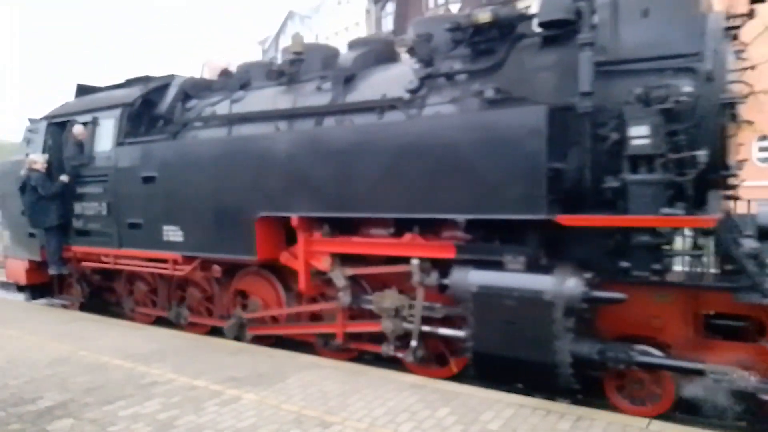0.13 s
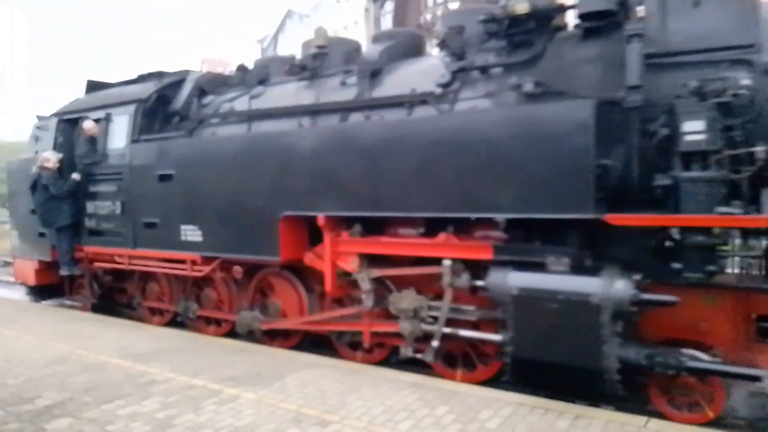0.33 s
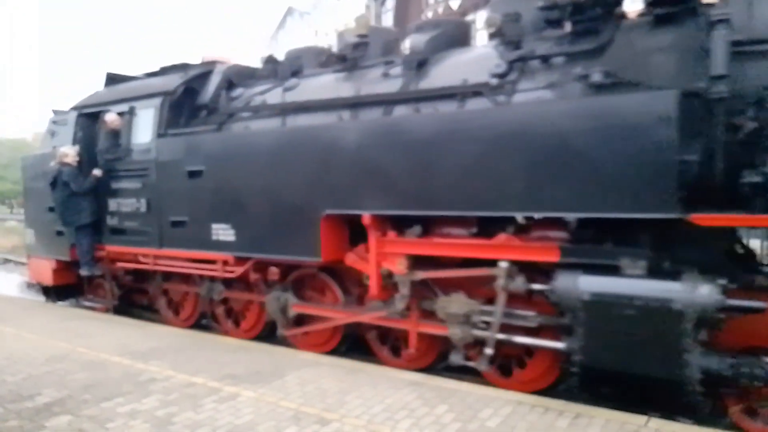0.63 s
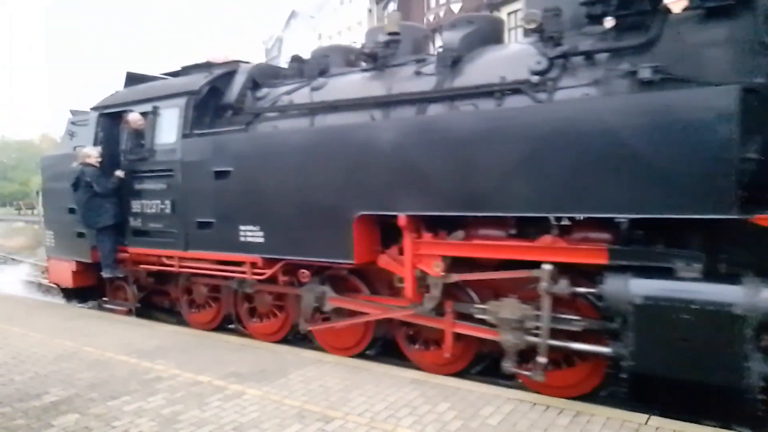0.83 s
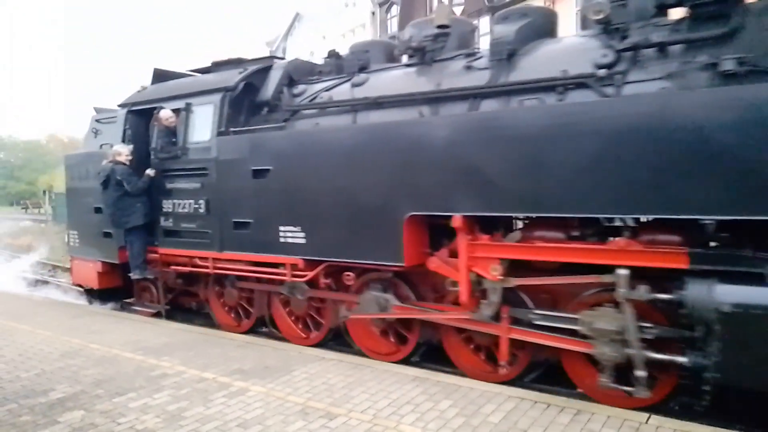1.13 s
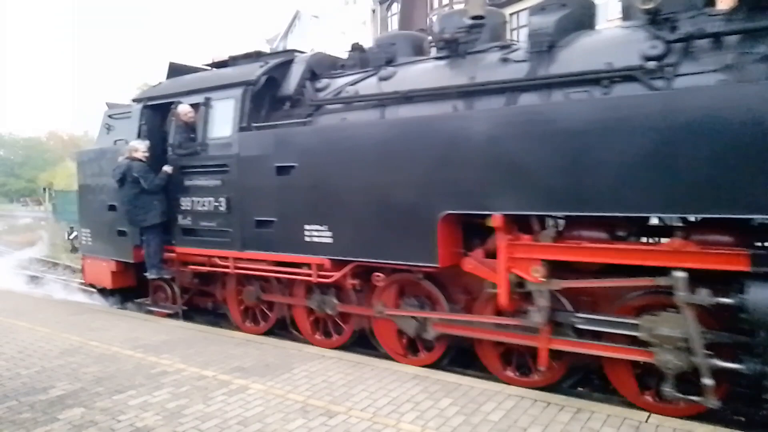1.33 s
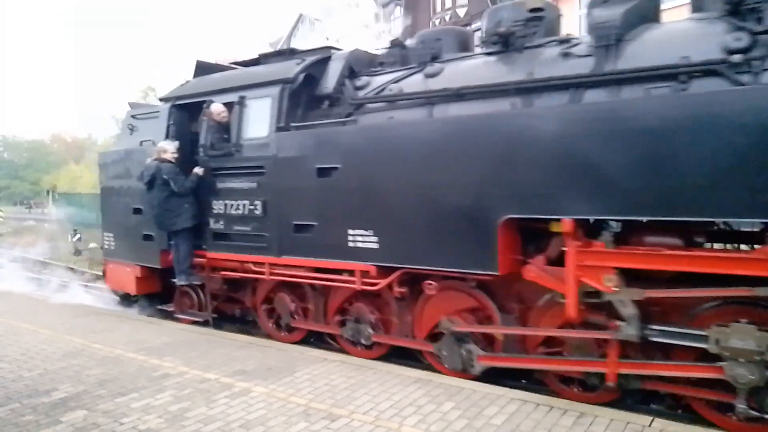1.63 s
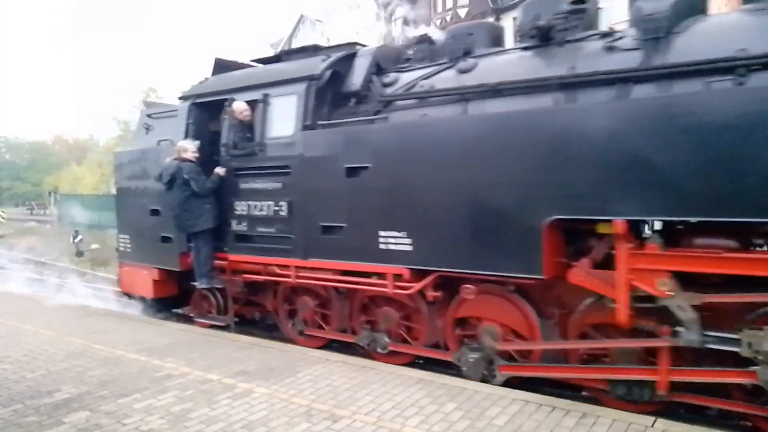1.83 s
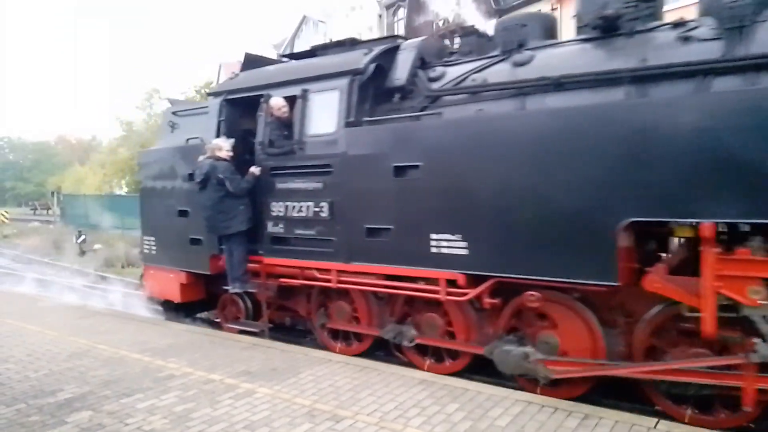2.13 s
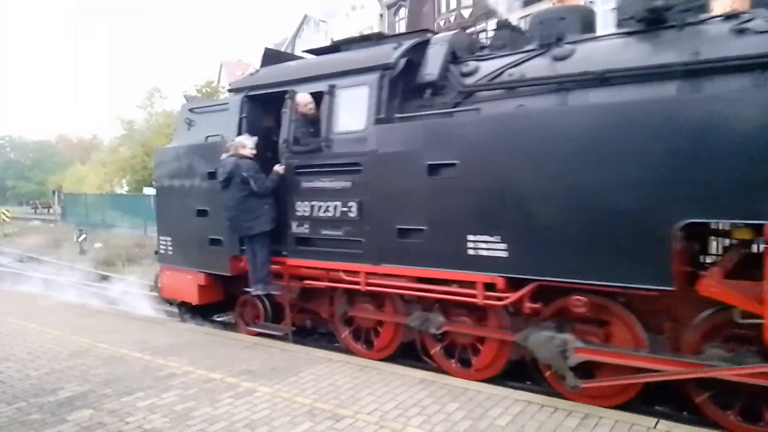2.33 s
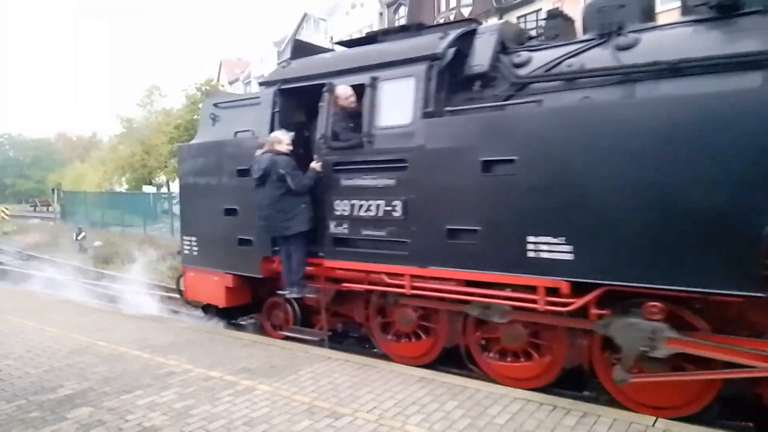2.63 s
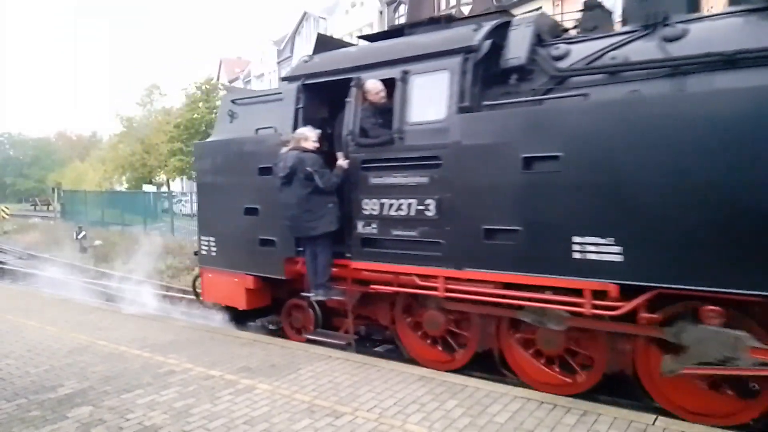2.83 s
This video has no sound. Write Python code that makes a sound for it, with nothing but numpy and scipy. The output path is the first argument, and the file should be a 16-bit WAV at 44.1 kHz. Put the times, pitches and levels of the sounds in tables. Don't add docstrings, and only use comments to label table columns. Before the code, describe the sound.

Continuous high, fluttering steam hiss from a slowly passing locomotive, with low rolling rumble and dull wheel thuds. Early knocks lead to a sudden steam blow and water sputter; thin whistles rise at the end. Outdoors, mono handheld camera.

```python
import sys
import numpy as np
from scipy import signal
from scipy.fft import rfft, irfft, next_fast_len
from scipy.io import wavfile
from scipy.ndimage import uniform_filter1d, map_coordinates

SR = 44100
rng = np.random.default_rng(int(sys.argv[2]) if len(sys.argv) > 2 else 0)


def voltage_ratio(level):
    return 10 ** (np.asarray(level, float) / 20)


def to_wav(s):
    ch = np.atleast_2d(s).T
    pcm = np.round(np.clip(ch, -1, 1) * 32767)
    wavfile.write(sys.argv[1], SR, pcm.astype(np.int16))


N = 131859

# frequency in Hz, level in dB per Hz.
AIR_SPECTRUM = [(100, -96.5), (2000, -85), (3200, -89), (5000, -87.5), (12000, -82), (15800, -86.5)]

# start in seconds, level in dB.
THUDS = [
    (.07, -55),
    (.53, -66),
    (1.2, -53),
    (2.0, -56),
    (2.72, -65),
    (2.86, -56),
    (2.97, -50),
]
# frequency in Hz, level in dB per Hz.
THUD_SPECTRUM = [(25, -11), (50, -6), (95, 4), (140, -4)]

# time in seconds, level in dB, share of the rear frame from 0 to 1.
ROLL_CURVE = [(0, -42.5, 0.08), (.25, -44, 0.13), (.4, -45.5, 0.38), (.6, -44, 0.21), (.9, -45, 0.09),
              (1.1, -43.5, 0.01), (1.3, -43, 0.81), (1.6, -45, 0.6), (1.82, -46.5, 0.6),
              (1.92, -43.5, 0.97), (2.3, -44, 0.88), (2.6, -45.5, 1), (2.75, -46.5, 0.92),
              (2.99, -47.5, 0.83)]
# frequency in Hz, width in Hz, level in dB.
FRONT_MODES = [(85, 29, -10.5), (286, 107, 1.5), (726, 130, 1.5), (1017, 144, -13.5), (1565, 71, -4)]
# frequency in Hz, width in Hz, level in dB.
REAR_MODES = [(87.6, 70, -10), (293.4, 43, 5), (374, 48.8, 4.5), (739, 110, -5.5), (1232, 45, 1),
              (1663, 95, -1), (2190, 280, -14)]
# frequency in Hz, level in dB per Hz.
RAIL_SPECTRUM = [(20, -31), (40, -17), (70, -8), (120, -12), (230, -5), (800, -8), (1300, -12.5),
                 (3200, -23.5)]

# start in seconds, level in dB, boost of the upper modes in dB.
CLANKS = [
    (.228, -37, -8),
    (0.43, -38, 1.5),
    (.482, -44, 0),
    (1.097, -41, -6.5),
    (2.612, -61, 4),
]
# frequency in Hz, width in Hz, level in dB.
ROD_MODES = [(677, 81, 3.5), (1160, 30, 2), (1488, 80, -4), (1850, 62, -9.5), (2130, 170, -16)]
# frequency in Hz, width in Hz, level in dB.
TICK_MODES = [(3030, 240, -6), (3600, 290, 2), (4260, 140, 1), (6200, 150, 0)]
# start in seconds, level in dB, pitch in Hz.
PINGS = [
    (1.097, -37, 1520),
    (.432, -41, 1150),
    (.48, -54, 3150),
    (.505, -56, 5550),
    (2.615, -44, 1800),
]

# time in seconds, level in dB, pitch in Hz.
VALVE_WHISTLE = [(2.25, -65, 12450), (2.5, -60, 12850), (2.62, -57, 13150), (2.8, -54, 13270),
                 (2.92, -54, 13270), (2.96, -52, 13020)]
# time in seconds, level in dB, pitch in Hz.
HIGH_WHISTLE = [(2.5, -72, 14700), (2.85, -60, 14720), (2.95, -53, 14730), (2.99, -56, 14730)]
# time in seconds, level in dB, pitch in Hz.
SQUEALS = [
    [(0, -54.5, 3796), (.1, -65, 3790), (.2, -89, 3720)],
    [(0, -67, 5580), (.15, -64, 5580), (.3, -73, 5580)],
    [(.3, -82, 7400), (.6, -61, 7200), (1.15, -57.5, 7360), (1.25, -88, 7200)],
]

# start in seconds, hold in seconds, level in dB, pitch in Hz, width in Hz.
WISPS = [(1.2, .2, -52, 15000, 500), (1.3, .4, -58, 12500, 500), (1.58, 0.28, -54, 14000, 450),
         (1.55, .38, -52, 12800, 400), (1.72, .15, -55, 15300, 450), (1.74, 0.2, -57, 2500, 250),
         (2.3, .36, -52, 12500, 320), (2.3, .33, -47, 11700, 310), (2.04, 0.18, -51, 11900, 350),
         (2.62, .3, -55, 14700, 600), (2.92, .05, -50, 14900, 700), (2.03, 0.19, -52.5, 1650, 140),
         (0.38, .1, -63, 5500, 150), (0.786, .2, -57.5, 1500, 46), (2.78, .25, -48.5, 378, 22),
         (1.19, 0.071, -40, 11100, 600), (.62, 0.19, -56.5, 1087, 83), (1.82, .3, -54.5, 1227, 60),
         (1.15, 0.093, -53, 2220, 300), (1.43, .12, -60.5, 3730, 460), (1.19, .15, -58, 13900, 800),
         (.44, .08, -50, 1300, 500), (0, .1, -52, 2100, 300)]

# time in seconds, level in dB.
LEAK_CURVE = [(0, -32), (.3, -32), (.6, -33), (.8, -34.5), (1.05, -34), (1.19, -32), (1.3, -34.5),
              (1.5, -32), (1.7, -32.5), (1.9, -32), (2.08, -28), (2.2, -29), (2.5, -32), (2.7, -31.5),
              (2.8, -31), (2.99, -31.5)]
# frequency in Hz, level in dB per Hz.
HISS_SPECTRUM = [(3000, -56), (6800, -26.5), (7600, -15), (8700, -5), (9500, 1), (10400, -6),
                 (11500, -13.5), (12200, -35)]

# frequency in Hz, level in dB per Hz.
LAST_ROAR_SPECTRUM = [(500, -11), (1000, -7.5), (1400, -3), (1800, 4), (2100, -5), (2350, -9)]
# frequency in Hz, level in dB per Hz.
LAST_HISS_SPECTRUM = [(3000, -21), (4600, -13), (5300, -5), (6200, -5.5), (7000, -2), (8000, -9)]
# start in seconds, hold in seconds, level in dB, 60 dB decay in seconds.
BLOWS = [
    (1.196, 0.011, -34.5, 0.79),
    (1.199, 0.26, -34.5, 3.7),
]
# frequency in Hz, level in dB per Hz.
BLOW_SPECTRUM = [(500, 2), (1200, 4.5), (2400, -0.5), (3200, -12.5), (4300, -4), (6300, -1), (10200, 11),
                 (12500, 1)]
# frequency in Hz, width in Hz.
ECHO_SHADOWS = [(3650, 48), (3950, 79), (4650, 80), (5900, 35), (6200, 90), (13700, 60), (14600, 80)]
# start, attack and hold in seconds, level in dB, 60 dB decay in seconds.
ROARS = [
    (1.079, 0.078, 0.73, -46.5, 0.91),
    (2.34, 0.11, .03, -50.5, 0.64),
]
# frequency in Hz, level in dB per Hz.
ROAR_SPECTRUM = [(400, -10), (900, -4), (1700, 4), (2100, -1.5), (2700, -5), (3050, -15), (4000, -11.5)]
# start, attack and hold in seconds, level in dB, 60 dB decay in seconds.
SPRAYS = [
    (1.194, .02, 0.25, -46, 1.6),
    (1.3, 0.3, .31, -44.5, 0.35),
    (1.85, 0.12, 1.1, -51, 4),
]
# frequency in Hz, level in dB per Hz.
SPRAY_SPECTRUM = [(6000, -25), (7000, 5.5), (11000, 3), (12300, -5), (13200, 2), (14000, 2), (14600, 1),
                  (15700, 1)]
# start in seconds, level of the pop in dB, level of the fizz in dB.
WATER_SLUGS = [(1.21, -31.5, -26), (1.293, -28.5, -48), (1.399, -31.5, -22.5), (1.434, -36, -40),
               (1.463, -27, -28), (1.523, -50, -41), (1.564, -50, -46), (1.78, -39.5, -27),
               (1.846, -39, -35), (1.911, -38, -40), (1.948, -52, -28.5)]

# frequency in Hz, level in dB per Hz.
GATE_THRESHOLD = [(100, -115), (1000, -80), (2200, -80.5), (3500, -85.5), (6000, -82), (7200, -80.5),
                  (12000, -79.5), (16500, -85.5)]
# frequency in Hz, level in dB per Hz.
DROPOUT_CEILING = [(100, -120), (2500, -89), (3500, -89), (6500, -87), (12000, -83), (16500, -83)]
# frequency in Hz, random height needed in sigma.
DROPOUT_RARITY = [(2600, 3.5), (2850, 1.8), (3400, 1.8), (3700, 2.2), (4200, 1.8), (4800, 1.9), (5100, 2.5),
                  (6100, 2.3), (6600, 3.5), (12000, 3.5), (13000, 2.9), (14600, 3), (16500, 3.5)]


def unit(x):
    return x / np.sqrt(np.mean(x ** 2) + 1e-20)


def along(points, hz):
    f, level_db = np.transpose(points)
    return np.interp(np.log(hz + 1), np.log(f + 1), level_db, left=-120, right=-120)


def curves(rows):
    s, *columns = np.transpose(rows)
    t = np.arange(N) / SR
    return [np.interp(t, s, column) for column in columns]


def wobble(rate):
    return map_coordinates(rng.standard_normal(N // 100), [np.arange(N) * rate / SR])


def filtered(x, response):
    m = next_fast_len(N + SR // 2)
    return irfft(rfft(x, m) * response(np.fft.rfftfreq(m, 1 / SR)), m)[:N]


def resonant(x, modes):
    def response(f):
        total = 0
        for k, (centre, width, db) in enumerate(modes):
            damping = 1j * f * width
            total = total + (-1) ** k * voltage_ratio(db) * damping / (centre * centre - f * f + damping)
        return total
    return filtered(x, response)


def smooth(cells, bands, frames):
    return uniform_filter1d(uniform_filter1d(cells, size=bands, axis=0), size=frames, axis=1)


def patchy(patchy_db):
    z = signal.stft(rng.standard_normal(N), nperseg=512)[2]
    patches = unit(smooth(rng.standard_normal(z.shape), 5, 10))
    return signal.istft(z * voltage_ratio(patchy_db * patches), nperseg=512)[1][:N]


def rush(spectrum, patchy_db):
    return unit(filtered(patchy(patchy_db), lambda hz: voltage_ratio(along(spectrum, hz))))


def puff(s, attack, hold, db, t60):
    t = np.arange(N) / SR - s
    release_db = 60 * np.maximum(t - attack - hold, 0) / t60
    return np.clip(t / attack, 0, 1) * voltage_ratio(db - release_db)


def blip(s, half_s):
    t = np.arange(N) / SR
    return np.exp(-((t - s - half_s) / half_s) ** 2)


def dips(f, bands, left):
    return np.prod([1 - (1 - left) * np.exp(-((f - c) / w) ** 2) for c, w in bands], axis=0)


def air():
    return filtered(patchy(patchy_db=0.85), lambda hz: voltage_ratio(along(AIR_SPECTRUM, hz)) * np.sqrt(SR / 2))


def thuds():
    pushes = sum(puff(s, attack=0.0076, hold=0.024, db=db, t60=0.36) for s, db in THUDS)
    return pushes * rush(THUD_SPECTRUM, patchy_db=-0.5)


def shaken_frame(modes):
    peaks = [(hz, 2.12 * width, 0) for hz, width, _ in modes]
    return unit(resonant(resonant(patchy(patchy_db=1.4), modes), peaks))


def rolling():
    level_db, rear = curves(ROLL_CURVE)
    rear = np.clip(rear, 0, 1)
    front_frame = shaken_frame(FRONT_MODES)
    rear_frame = shaken_frame(REAR_MODES)
    rail = voltage_ratio(-7.5) * rush(RAIL_SPECTRUM, patchy_db=-0.1)
    passing = np.sqrt(1 - rear) * front_frame + np.sqrt(rear) * rear_frame
    return voltage_ratio(level_db + 0.2 * wobble(11.16)) * (passing + rail)


def rods():
    rattle = unit(resonant(rng.standard_normal(N), ROD_MODES))
    upper = filtered(rattle, lambda hz: hz > 900)
    tick = unit(resonant(rng.standard_normal(N), TICK_MODES))
    out = np.zeros(N)
    for s, db, upper_db in CLANKS:
        out += puff(s, 0.0015, 0.0055, db, t60=0.53) * (rattle + (voltage_ratio(upper_db) - 1) * upper)
        out += puff(s, 0.0015, 0.0045, db + upper_db - 12, t60=0.039) * tick
    return out


def pings():
    t = np.arange(N) / SR
    return sum(voltage_ratio(db) * blip(s, 0.006) * np.sin(2 * np.pi * hz * (t - s)) for s, db, hz in PINGS)


def whistles():
    t = np.arange(N) / SR
    out = np.zeros(N)
    for rows in (VALVE_WHISTLE, HIGH_WHISTLE, *SQUEALS):
        level_db, hz = curves(rows)
        started = t >= rows[0][0]
        level = voltage_ratio(level_db + 1.7 * wobble(47)) * started
        pitch_hz = hz + 75 * wobble(300)
        out += level * np.sqrt(2) * np.sin(2 * np.pi * np.cumsum(pitch_hz) / SR)
    return out


def wisps():
    out = np.zeros(N)
    for s, hold, db, hz, width in WISPS:
        band = filtered(rng.standard_normal(N), lambda f: np.exp(-((f - hz) / width) ** 2))
        out += puff(s, 0.031, hold, db, t60=0.52) * unit(band)
    return out


def leak():
    level_db, = curves(LEAK_CURVE)
    flutter_db = 0.34 * wobble(26.03) + 0.56 * wobble(50)
    steady = voltage_ratio(level_db + flutter_db) * rush(HISS_SPECTRUM, patchy_db=1.1)
    jet = resonant(rng.standard_normal(N), [(9500, 890, 0)])
    jet = unit(resonant(jet, [(9540, 750, 0)]))
    fizz = sum(voltage_ratio(fizz_db) * blip(s, 0.0039) for s, _, fizz_db in WATER_SLUGS)
    return steady + fizz * jet


def water_pops():
    t = np.arange(N) / SR
    pop_hz = 1233
    return sum(voltage_ratio(pop_db) * blip(s, 0.0028) * np.sin(2 * np.pi * pop_hz * (t - s))
               for s, pop_db, _ in WATER_SLUGS)


def drain_cock():
    last = puff(-0.12, 0.084, 0.24, -46, 1.2) * rush(LAST_ROAR_SPECTRUM, patchy_db=-0.5)
    last += puff(-0.11, 0.075, 0.02, -43, 0.62) * rush(LAST_HISS_SPECTRUM, patchy_db=1.5)

    def shadow(f):
        return dips(f, ECHO_SHADOWS, left=0.16)

    blow = sum(puff(s, 0.0065, hold, db, t60) for s, hold, db, t60 in BLOWS)
    blow = blow * filtered(rush(BLOW_SPECTRUM, patchy_db=0.0), shadow)
    roar = sum(puff(*row) for row in ROARS) * rush(ROAR_SPECTRUM, patchy_db=3.0)
    spray = sum(puff(*row) for row in SPRAYS) * filtered(rush(SPRAY_SPECTRUM, patchy_db=0.5), shadow)
    return (last + blow + roar + spray) * voltage_ratio(1.32 * wobble(21.83)) + water_pops()


def scene():
    background = air() + thuds() + rolling()
    engine = rods() + pings() + whistles() + wisps()
    steam = leak() + drain_cock()
    return np.tile(background + engine + steam, (2, 1))


def noise_suppressor(x):
    hz, _, z = signal.stft(x, SR, nperseg=512, noverlap=384, scaling="psd")
    power = uniform_filter1d(2 * np.abs(z) ** 2, size=3, axis=0)
    recent = uniform_filter1d(power, size=33, axis=1, origin=11)
    sudden = voltage_ratio(2 * -2.5) * uniform_filter1d(power, size=5, axis=1)
    power = np.maximum(recent, sudden)
    over_db = 10 * np.log10(np.abs(power) + 1e-20) - along(GATE_THRESHOLD, hz)[:, None]
    shut = (1 - np.tanh(over_db / 2.5)) / 2
    return signal.istft(z * voltage_ratio(-10 * shut), SR, nperseg=512, noverlap=384, scaling="psd")[1][:N]


def dropouts(x):
    hz, _, z = signal.stft(x, SR, nperseg=1024, noverlap=768, scaling="psd")
    power = smooth(2 * np.abs(z) ** 2, 9, 15)
    chance = unit(smooth(rng.standard_normal(z.shape), 3, 11))
    rarity = np.interp(hz, *np.transpose(DROPOUT_RARITY), left=9)[:, None]
    quiet = power < voltage_ratio(2 * along(DROPOUT_CEILING, hz))[:, None]
    lost = (chance > rarity) & quiet
    lost = smooth(lost * 1.0, 2, 7) > 1e-6
    return signal.istft(z * voltage_ratio(-30 * lost), SR, nperseg=1024, noverlap=768, scaling="psd")[1][:N]


def casing(x):
    return filtered(x, lambda f: (f < 15740) * dips(f, [(162.7, 36)], left=0.16))


def top_cut(x):
    return signal.sosfilt(signal.butter(12, 16540, fs=SR, output="sos"), x)


def record(dry):
    mono = noise_suppressor(dry[0])
    mono = casing(dropouts(mono))
    return top_cut(np.tile(mono, (2, 1)))


dry = scene()
out = record(dry)
to_wav(out)
```